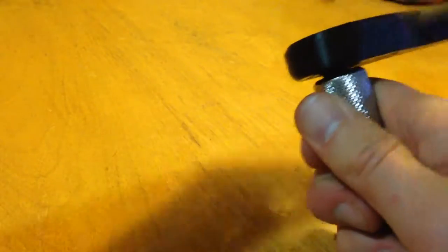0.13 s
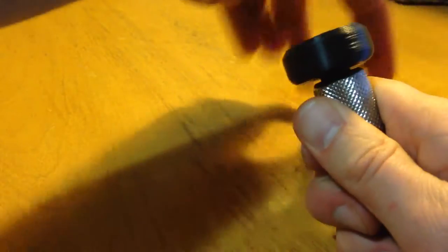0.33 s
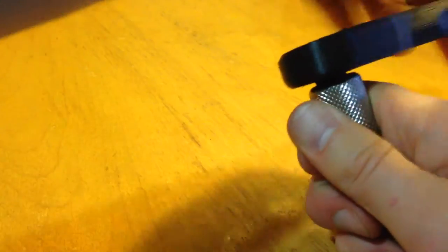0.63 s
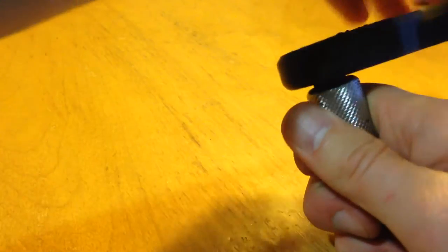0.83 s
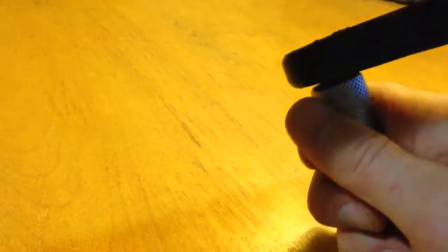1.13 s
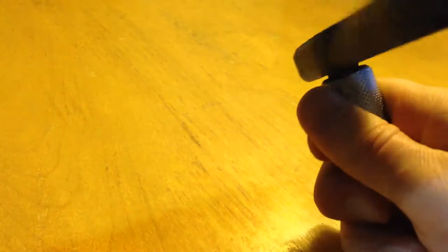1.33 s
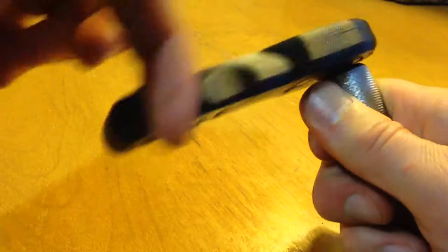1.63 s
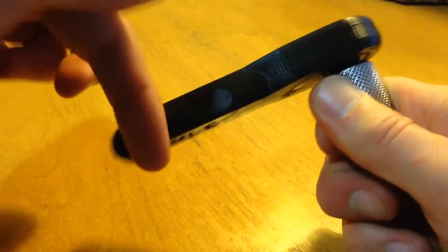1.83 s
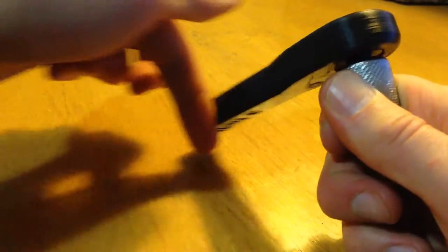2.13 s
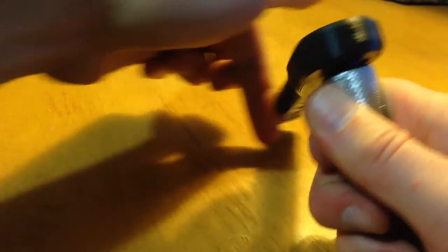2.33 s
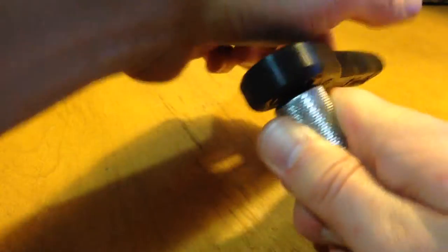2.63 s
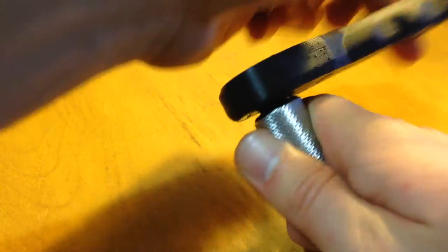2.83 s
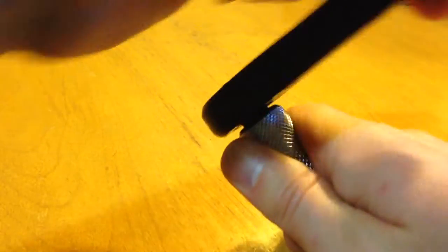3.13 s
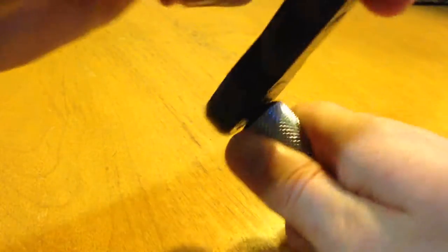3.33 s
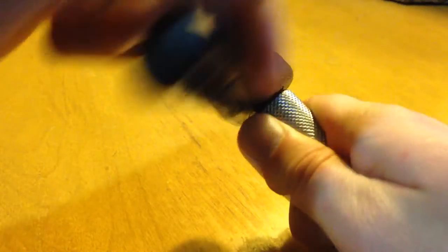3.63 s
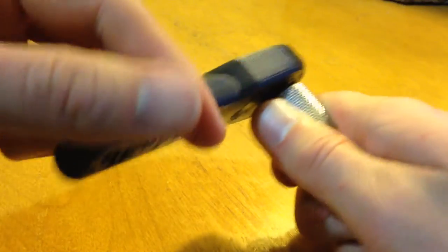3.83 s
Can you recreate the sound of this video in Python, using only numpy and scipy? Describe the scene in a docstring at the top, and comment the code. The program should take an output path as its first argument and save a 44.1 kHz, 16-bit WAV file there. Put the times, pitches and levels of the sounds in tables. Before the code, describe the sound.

A plastic ratchet wrench is turned slowly by hand, giving sparse sharp clicks. Faint scraping and a soft click come first, then a lull, then three louder snaps, close to the microphone in a small, quiet room.

```python
"""Ratchet wrench over a desk

A plastic ratchet wrench is turned by hand on a knurled steel socket, close above a wooden desk in a
small room. The parts scrape and catch as the grip shifts, then the pawl snaps over single teeth,
each snap a cluster of contacts. The hands nudge the desk faintly and the room hums. One microphone."""
import sys
import numpy as np
from scipy import signal
from scipy.fft import rfft, irfft, next_fast_len
from scipy.io import wavfile

SR = 44100
rng = np.random.default_rng(int(sys.argv[2]) if len(sys.argv) > 2 else 0)


def wav_record(signal):
    """Record a signal, one row per channel, as 16-bit PCM in the file named by sys.argv[1]."""
    frames = np.transpose(np.atleast_2d(signal))
    bounded = np.clip(frames, -1, 1)
    # unit amplitude maps onto the largest positive 16-bit level
    quanta = np.round(bounded * 32767).astype(np.int16)
    wavfile.write(sys.argv[1], SR, quanta)


N = 176400

# the room's drones (pitch [Hz], width [Hz], level [dB])
ROOM_DRONES = [(91.3, 8.7, -63.5), (159.3, 24, -64), (220.8, 16, -64.5), (372, 66, -69), (987, 41, -76.5)]
# air in the room (frequency [Hz], relative level [dB])
AIR_SPECTRUM = [(15, -41.5), (27, -20.5), (50, -7), (72, -13.5), (130, -6.5), (200, -12.5), (300, -13),
                (560, -20.5), (1050, -25), (1600, -27.5), (3000, -38.5), (6000, -43.5), (15500, -50.5)]
# decay of the room's tail (frequency [Hz], t60 [s])
TAIL_DECAY = [(200, .3), (1500, .33), (5000, 0.25), (9000, 0.27), (15000, .2)]
# sound off the walls (frequency [Hz], relative level [dB])
WALL_SPECTRUM = [(200, -3.5), (1500, -0.5), (6500, -0.5), (10000, -9.5), (15000, -4.5)]
# hands nudging the desk (middle time [s], length [s], level [dB])
DESK_NUDGES = [(0.228, 0.048, -51.5), (0.35, 0.15, -52.5), (0.677, 0.14, -57.5), (1.412, .2, -58.5),
               (2.453, 0.027, -46), (3.055, 0.0804, -55.5), (3.351, 0.19, -56)]
# parts sliding and catching
# (middle time [s], length [s], level [dB], bass gain [dB], ring pitch [Hz], ring gain [dB])
SCRAPE_EVENTS = [(.008, 0.016, -48, -10.5, 5200, -3), (0.02, 0.0041, -43, 1, 908, -5),
                 (0.0574, 0.0042, -41, -16, 5400, -0.5), (0.063, 0.0075, -52, -2, 880, 4.5),
                 (0.057, 0.083, -57.5, -3.5, 5200, -6), (.018, 0.011, -55, 1, 1880, 2),
                 (0.095, 0.0088, -50.5, -11, 5000, -7), (0.111, 0.017, -59.5, 3, 1030, 1.5),
                 (0.137, 0.0045, -49.5, -5, 5420, -7), (0.154, 0.027, -56, -2, 5000, -1),
                 (0.191, 0.009, -48, -8, 5600, -10), (.208, 0.016, -50.5, -11, 1184, -1.5),
                 (0.243, 0.023, -48.5, -13, 2880, -7), (.277, 0.01, -56.5, -3.5, 2874, 4.5),
                 (0.292, 0.026, -57, -9, 5340, -23), (0.326, 0.041, -64.5, -12, 2840, -7.5),
                 (0.466, 0.0057, -66.5, -4, 6850, -4), (0.535, 0.075, -67, -3, 6900, -12),
                 (.552, 0.0094, -50, -5, 645, -5), (0.569, 0.0066, -48.5, -16, 6750, -6),
                 (.719, 0.0067, -69, -8, 3750, -2), (1.1187, 0.0026, -68.5, 1, 1110, 16),
                 (1.127, 0.019, -79.5, -4, 925, 18), (1.713, 0.017, -72.5, -3, 12800, -5),
                 (1.915, 0.03, -76, -12, 6500, -3), (2.013, 0.02, -76.5, -6, 6360, 2),
                 (1.98, 0.071, -82, -7, 3630, 3), (2.136, .012, -76, -12, 6460, -7),
                 (3.239, .006, -74, -15, 6100, -2), (3.743, .006, -51.5, -6, 1450, 2),
                 (3.816, 0.0025, -59, -12, 12500, -5)]
# the tool's resonances under sliding (frequency [Hz], width [Hz], relative level [dB])
SLIDE_MODES = [(833, 270, 3.5), (1230, 200, 11), (1900, 510, 0), (2934, 190, 4), (3740, 270, -3.5),
               (4420, 190, 4), (5060, 380, 2.5), (5700, 320, 1), (6100, 180, -1), (6840, 500, 3),
               (8200, 240, -7.5)]
# grit of the sliding (frequency [Hz], relative level [dB])
GRIT_SPECTRUM = [(300, -5.5), (700, 9), (3000, 1), (6000, -5), (9000, -2.5), (15000, -14)]
# pawl contacts (time [s], gain [dB], knock [dB], low [dB], mid [dB], high [dB], top [dB],
# decay time [factor], steel gain [dB], favoured frequency [Hz], its boost [dB])
PAWL_CONTACTS = [(0.6133, -39.5, 21, 4, 6.5, -16, -14, 0.75, -50, 480, 18),
                 (0.6163, -27, 5.5, -12.5, 5.5, -17, -22, 1.88, -44, 2520, 9),
                 (0.6181, -30.5, -4, -20, -1.5, -19, -20, 0.85, -38.5, 3780, 18.5),
                 (.6255, -29.5, 17, -27, -10, -19, -9, 0.72, -54, 13000, 17),
                 (.628, -40.5, 18, -10, -5, -5, -23, 1.56, -55, 7100, 15),
                 (.6315, -25, -7, -3, -7, -22, -16, 0.45, -48, 3780, 9),
                 (2.4507, -16, -4.5, -8.5, -1.5, -2.5, -6, 1.3, -31, 4900, 7.5),
                 (2.4575, -35, 3, 2, 4, -3, 6.5, 1.6, -39, 2500, 0),
                 (2.463, -40, 4, 1, -2.5, -5, -9.5, 1.6, -41.5, 1420, 8.5),
                 (2.9786, -24.5, 1.5, -6, -2, -9.5, -11.5, 2.1, -55.5, 3480, 4.5),
                 (2.982, -31.5, -3.5, -6.5, 4, -8.5, -8.5, 1.3, -54, 3480, 13.5),
                 (2.9848, -22, -5.5, -9, -6.5, -3, -7.5, 1.33, -52.5, 3480, 6),
                 (3.0249, -9.5, -11, -6, -5, -2, -2.5, 1.1, -58, 5550, 9.5),
                 (3.0312, -18, 3, 0.5, -4, -3, -6, 0.92, -44.5, 2150, 4),
                 (3.033, -27, 3, 2.5, -1, -6, -9.5, 1.46, -54.5, 3400, 4.5),
                 (3.6768, -52.5, -7.5, -11.5, 0, -0.5, 3, 1.3, -59.5, 3480, 7.5),
                 (3.6868, -20.5, -15.5, -16, -0.5, -2, -8.5, 1.45, -59.5, 3480, 7),
                 (3.6927, -27.5, 13, 5, -1, -12, 6, 2.1, -56.5, 6500, 4),
                 (3.6985, -10, -0.5, 0, -5, 2, 6, 0.91, -64.5, 3170, 16)]
# a contact's colour bands: knock, low, mid, 0 dB reference, high, top (centre [Hz])
BAND_CENTRES = [750, 1700, 3200, 5600, 8300, 11500]
# crack of a contact (frequency [Hz], relative level [dB])
CRACK_SPECTRUM = [(200, -21), (700, -14.5), (2000, 2), (3300, 3), (6000, 1.5), (10500, -0.5), (12200, -15),
                  (14500, -11.5), (16000, -22)]
# ringing of the plastic wrench (frequency [Hz], relative level [dB], base t60 [s])
WRENCH_MODES = [(460, -32.5, 0.024), (755, -20.5, 0.012), (1150, -15.5, 0.011), (1460, -13.5, .014),
                (2100, -15.5, 0.018), (2490, -11.5, 0.012), (3160, -10.5, 0.013), (3516, -7, 0.012),
                (3890, -17.5, .018), (4326, -12, 0.018), (4987, -9.5, 0.012), (5500, -12, 0.0095),
                (6155, -7, 0.011), (6536, -5, .012), (7310, -11, 0.014), (8510, -1.5, 0.0091),
                (10790, -15, 0.0045)]
# lingering ring of the steel socket (base frequency [Hz], relative level [dB], t60 [s])
SOCKET_MODES = [(3640, 1.5, .18), (5286, -5, .16), (6621, -1.5, 0.17)]
# the grip shifts the socket's pitch (time [s], pitch [factor])
GRIP_TUNING = [(.62, 1.042), (2.45, 1.003), (3.0, .975)]


def amp(db):
    return 10 ** (np.asarray(db) / 20)


def unit_rms(x):
    return x / np.sqrt(np.mean(x ** 2) + 1e-20)


def along(points, hz):
    """Read (Hz, value) points on a log axis."""
    f, v = np.transpose(points)
    return np.interp(np.log(hz + 1), np.log(f + 1), v)


def filtered(x, response):
    """Shape x by a gain that depends on frequency."""
    size = next_fast_len(len(x) + 8192)
    return irfft(rfft(x, size) * response(np.fft.rfftfreq(size, 1 / SR)), size)[:len(x)]


def noise(spectrum, size):
    """Coloured noise of rms 1."""
    return unit_rms(filtered(rng.standard_normal(size), lambda f: amp(along(spectrum, f))))


def resonance(f, hz, width):
    return 1j * f * width / (hz * hz - f * f + 1j * f * width)


def drone(hz, width):
    """A narrow band of noise of rms 1."""
    return unit_rms(filtered(rng.standard_normal(N), lambda f: resonance(f, hz, width) ** 2))


def swell(middle, length):
    """A bell-shaped rise and fall, timed in seconds."""
    return np.exp(-2 * ((np.arange(N) / SR - middle) / length) ** 2)


def add(track, start_s, x):
    part = track[max(0, round(start_s * SR)):][:len(x)]
    part += x[:len(part)]


def room_tone(air_db=-59.5):
    """The bed behind the tool: soft air noise and a few low drones."""
    air = amp(air_db) * noise(AIR_SPECTRUM, N)
    return air + sum(amp(db) * drone(hz, width) for hz, width, db in ROOM_DRONES)


def room_response(tail_db=-22, early_db=-20, early_t60_s=0.1, wall_delay_s=0.008):
    """What near walls send back to the microphone: early reflections and a diffuse tail."""
    size = SR // 2
    hz, t, spectra = signal.stft(noise(WALL_SPECTRUM, size), SR, nperseg=256)
    decay = amp(-60 * t / along(TAIL_DECAY, hz)[:, None])
    tail = signal.istft(spectra * decay, SR, nperseg=256)[1][:size]
    early = noise(WALL_SPECTRUM, size) * amp(-60 * np.arange(size) / SR / early_t60_s)
    response = np.zeros(size)
    add(response, wall_delay_s, amp(tail_db) * tail / np.linalg.norm(tail))
    add(response, wall_delay_s, amp(early_db) * early / np.linalg.norm(early))
    return response


def desk():
    """The desk just under the tool booms softly when nudged."""
    phase = np.angle(signal.hilbert(drone(hz=93.24, width=4)))
    boom = np.sqrt(2) * np.cos(phase)
    return boom * sum(amp(db) * swell(middle, length) for middle, length, db in DESK_NUDGES)


def scrapes(slips_per_s=7000, grit_db=-6, relative_ring_width=0.062, room_send_db=-5):
    """Dense tiny slips excite the tool while its parts slide; each catch favours one resonance."""
    slips = rng.standard_normal(N) * (rng.random(N) < slips_per_s / SR)
    body = filtered(slips, lambda f: sum((-1) ** k * amp(db) * resonance(f, hz, width)
                                         for k, (hz, width, db) in enumerate(SLIDE_MODES)))
    grit = filtered(slips, lambda f: amp(along(GRIT_SPECTRUM, f)))
    rub = unit_rms(unit_rms(body) + amp(grit_db) * unit_rms(grit))
    bass = filtered(rub, lambda f: 1 / (1 + (f / 2100) ** 6))
    # a wandering phase widens each ring into a band
    drift = np.cumsum(rng.standard_normal(N)) * np.sqrt(2 * np.pi / SR)
    direct, t = np.zeros(N), np.arange(N) / SR
    for middle, length, db, bass_db, hz, ring_db in SCRAPE_EVENTS:
        ring = np.sqrt(2) * np.sin(2 * np.pi * hz * t + drift * np.sqrt(hz * relative_ring_width))
        direct += amp(db) * swell(middle, length) * (rub + (amp(bass_db) - 1) * bass + amp(ring_db) * ring)
    return direct + amp(room_send_db) * signal.fftconvolve(direct, room_response())[:N]


def tool_ring(t, colour, decay_scale, steel_db, tuning):
    """Struck by the pawl, the plastic rings briefly and the steel socket rings on faintly."""
    plastic = [(hz, db, t60 * decay_scale) for hz, db, t60 in WRENCH_MODES]
    steel = [(hz * tuning, db + steel_db, t60) for hz, db, t60 in SOCKET_MODES]
    ring = np.zeros(len(t))
    for k, (hz, db, t60) in enumerate(plastic + steel):
        phase = 2 * np.pi * hz * t + rng.normal(0, 0.77)
        ring += (-1) ** k * colour(hz) * amp(db - 60 * t / t60) * np.sin(phase)
    return ring


def pawl(attack_s=0.00037, crack_db=0.5, crack_t60_s=0.011, focus_width=0.098, room_send_db=0.5):
    """Each contact cracks and rings the tool, favouring one band; the room answers with a smooth tail."""
    out, t = np.zeros(N), np.arange(SR // 4) / SR
    radiation = signal.butter(2, 476, 'highpass', fs=SR, output='sos')  # a small tool gives little bass
    for start, db, knock, low, mid, high, top, decay_scale, steel_db, focus_hz, boost in PAWL_CONTACTS:
        bands = list(zip(BAND_CENTRES, [knock, low, mid, 0, high, top]))

        def colour(f):
            return amp(along(bands, f) + boost * np.exp(-((f / focus_hz - 1) / focus_width) ** 2))

        tuning = np.interp(start, *np.transpose(GRIP_TUNING))
        ring = tool_ring(t, colour, decay_scale, steel_db, tuning)
        crack = filtered(noise(CRACK_SPECTRUM, len(t)), colour)
        crack *= amp(crack_db - 60 * t / (crack_t60_s * decay_scale))
        snap = amp(db) * (1 - np.exp(-t / attack_s)) * (ring + crack)
        add(out, start, signal.sosfilt(radiation, snap))
        room = room_response()
        tail = unit_rms(filtered(room, lambda f: amp(along(CRACK_SPECTRUM, f) + along(bands, f))))
        add(out, start, amp(room_send_db) * np.linalg.norm(snap) * np.std(room) * tail)
    return out


def scene():
    """Wrench, desk and room as they reach the microphone, in mono."""
    return (pawl() + scrapes() + desk() + room_tone())[None]


def record(dry):
    """The microphone chain cuts off steeply at its band limit."""
    limit_hz = 15500
    return np.array([filtered(x, lambda f: 1 / (1 + (f / limit_hz) ** 120)) for x in dry])


dry = scene()
out = record(dry)
wav_record(out)
```